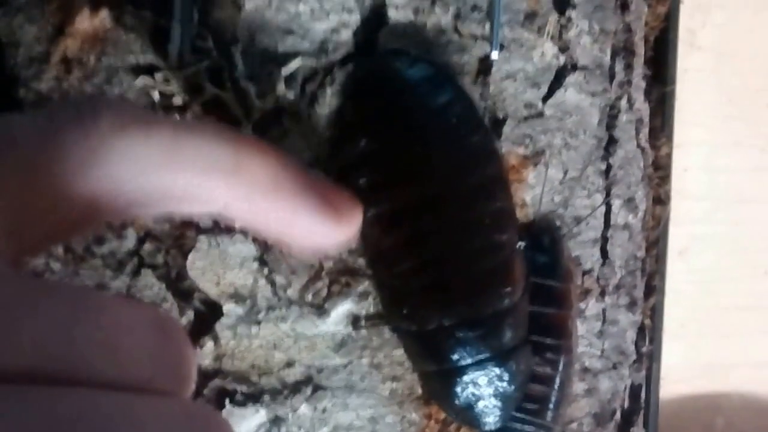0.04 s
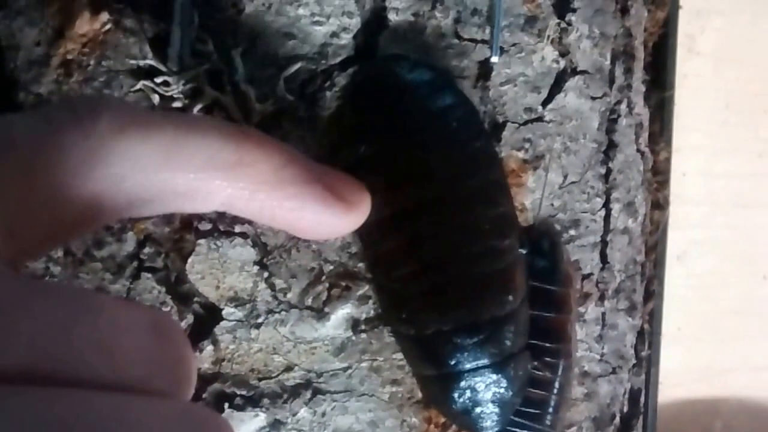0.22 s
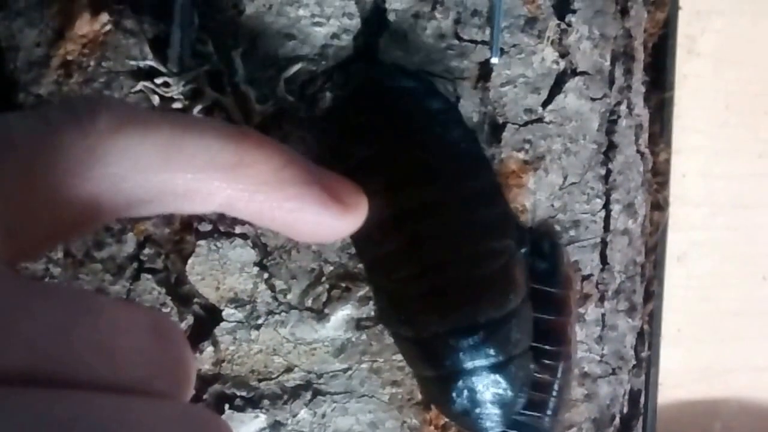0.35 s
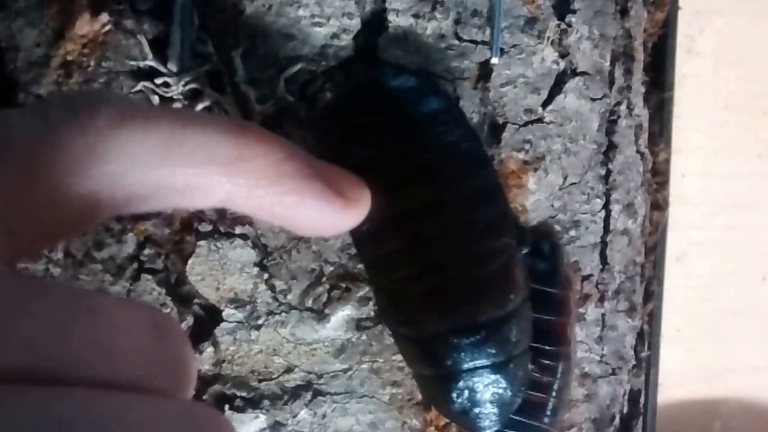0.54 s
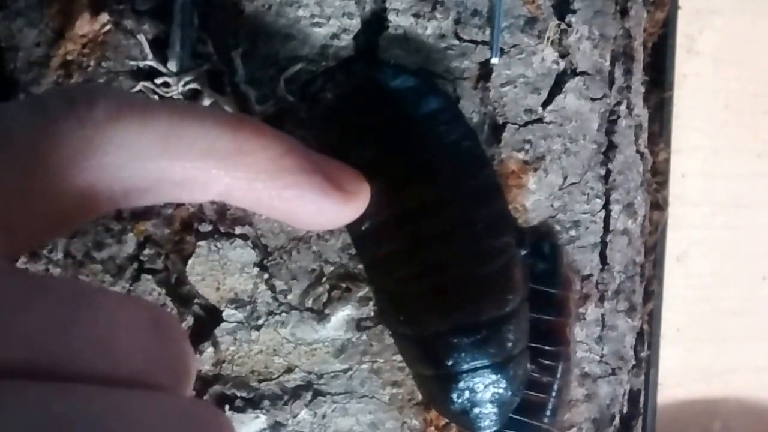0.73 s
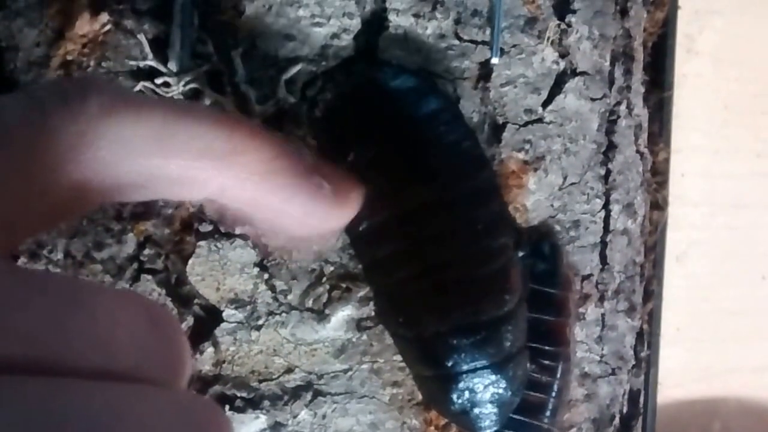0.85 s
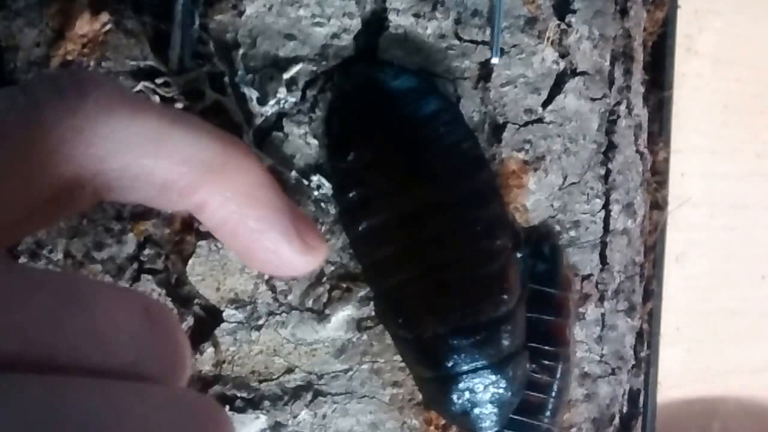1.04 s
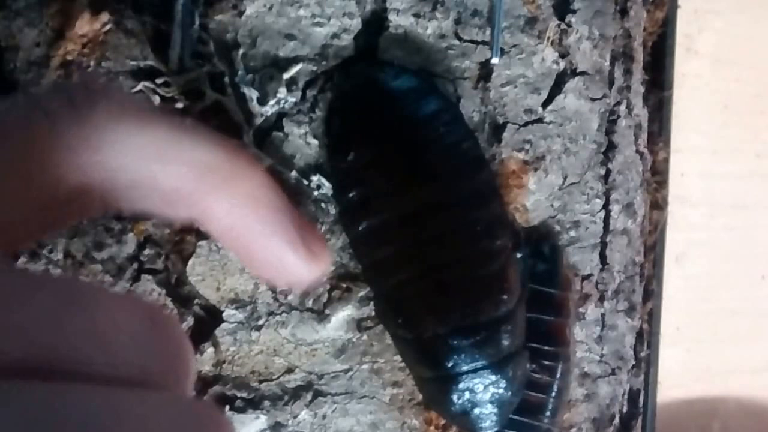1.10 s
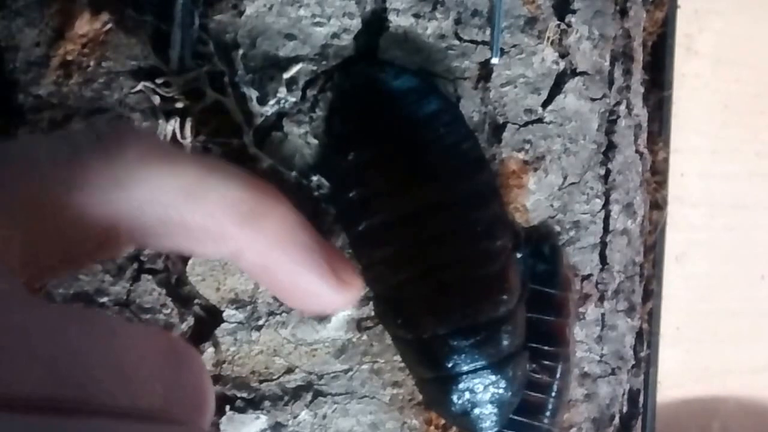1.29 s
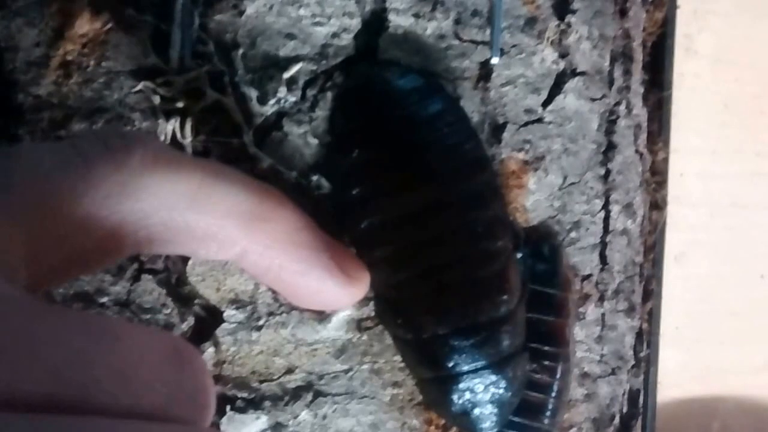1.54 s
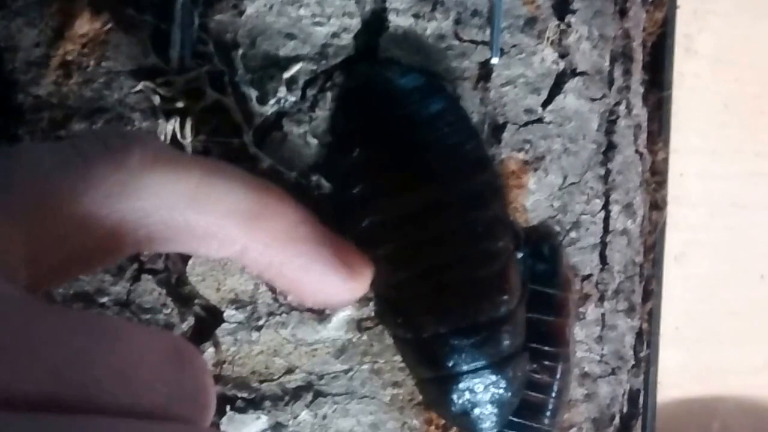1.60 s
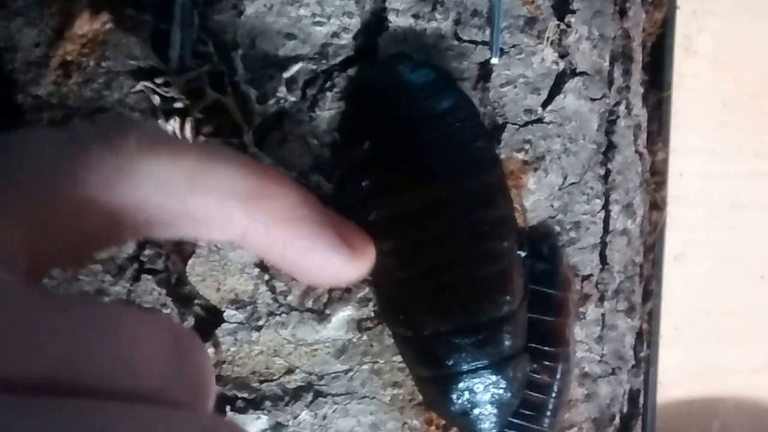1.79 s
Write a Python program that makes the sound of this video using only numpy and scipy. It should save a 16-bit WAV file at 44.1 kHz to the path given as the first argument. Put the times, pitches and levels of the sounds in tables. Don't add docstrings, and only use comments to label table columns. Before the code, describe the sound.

A large cockroach hisses once, loud and close: quiet until 0.19 s, then a sudden bright, rough rush of air, strongest near 0.45 s, weakening after 0.73 s and gone by 0.8 s. Short reflections from the glass tank colour it in wide stereo. Beneath are low motor hum, house rumble and faint noise, with soft low handling bumps near 0.05, 0.55 and 1.05 s; only quiet background follows.

```python
import sys
import numpy as np
from scipy import signal
from scipy.fft import rfft, irfft, next_fast_len
from scipy.io import wavfile
from scipy.ndimage import uniform_filter1d, map_coordinates

SR = 44100
rng = np.random.default_rng(int(sys.argv[2]) if len(sys.argv) > 2 else 0)


def natural_amplitude(level_db):
    exponent = np.asarray(level_db, float) / 20
    return 10 ** exponent


def store_pcm(level_fs):
    pcm = np.round(np.clip(level_fs, -1, 1) * 32767).astype(np.int16)
    wavfile.write(sys.argv[1], SR, np.atleast_2d(pcm).T)


N = 81585
T = np.arange(N) / SR

# time in seconds, level in dB.
EFFORT = [
    (.19, -77),
    (.195, -57),
    (.198, -40.5),
    (0.242, -35),
    (.44, -29.5),
    (.73, -31),
    (0.767, -33.5),
    (0.778, -40.5),
    (0.793, -97),
]
# centre in Hz, width in Hz, level in dB.
LEFT_MODES = [(1280, 73, -20), (2450, 440, -18), (3460, 710, -11.5), (3930, 350, -9), (4960, 590, -13),
              (5624, 450, -5), (6990, 560, -2.5), (7850, 330, 0), (8790, 380, -1), (9550, 340, -3),
              (10200, 580, -7), (10780, 200, -11.5), (11550, 400, -9), (14200, 1700, -17)]
RIGHT_MODES = [(1308, 130, -19), (1842, 157, -11.5), (2410, 470, -18), (4000, 606, -5), (4830, 525, 1),
               (5430, 350, -2.5), (6800, 340, -7.5), (7580, 230, -6), (8480, 370, -7), (8700, 540, -6),
               (9620, 230, -10), (10830, 250, -8), (11550, 370, -13.5), (15000, 580, -21)]
# frequency in Hz, level in dB.
JET_SPECTRUM = [(700, -43), (1100, -18), (2000, 8), (6200, 2), (12600, 11), (13600, 0), (15300, 3),
                (15600, -23)]
# frequency in Hz, lag in cycles.
TRAIL_LOW = [(1450, 0), (1950, .5), (3150, .5), (3650, 1.05), (4900, 1.56), (5500, 2.13), (6100, 2.2),
             (7000, 2.28)]
TRAIL_HIGH = [(8250, 2.62), (8480, 3.1), (9300, 3.15), (9800, 3.5), (10300, 3.5), (11900, 4), (12300, 4),
              (12600, 4.5)]
TRAIL_TOP = [(13500, 4.5), (14450, 5), (14700, 5), (15300, 5.6)]
# low Hz, high Hz, share from 0 to 1.
MIRROR_BANDS = [(990, 1260, .99), (1913, 2522, 1), (2540, 2800, 0.36), (2840, 3050, 0.89),
                (11600, 15000, .6), (12600, 12000, .55), (14480, 14660, .85)]
# delay in ms, level in dB.
WALL_ECHOES = [(1.1, -19.5), (1.7, -20), (2.3, -17.5), (3.4, -17.5), (4.3, -16.5), (5.9, -17.5),
               (8.2, -18.5), (11.5, -20.5)]
# frequency in Hz, rms level in dB, left over right in dB, left lead in rad,
# share of the beat.
MOTOR_ORDERS = [(42.9, -55.5, 3.5, 0.72, 0.1), (128.8, -53.5, 3, 0.83, 0.74),
                (172.3, -66.5, 1.5, 1.15, 0.3), (258.4, -74, 1.5, 2.2, -0.42),
                (320, -75.5, 4.5, 1.8, -0.69), (1233, -73, -2, .05, -0.043)]
# time in seconds, swell in dB.
ROOM_BEAT = [(0, -9.5), (0.091, -2.5), (.3, -8), (.7, -2.5), (1.0, .5), (1.26, 3), (1.44, 2), (1.49, -6.5),
             (1.53, 0), (1.6, -6), (1.66, -2.5), (1.84, -6.5)]
# start in seconds, length in seconds, pitch in Hz, level in dB.
HAND_BUMPS = [
    (0.032, 0.089, 36.2, -43.5),
    (.512, 0.11, 38.2, -39.5),
    (1.027, 0.056, 37.8, -47.5),
]
# frequency in Hz, level in dB.
SKIN_SPECTRUM = [(60, 7), (300, -5), (700, -2.5), (1000, -34)]
# frequency in Hz, density in dB per Hz.
RUMBLE_SPECTRUM = [(15, -7.5), (40, -4), (70, -5), (150, -11.5), (300, -10), (450, -11), (700, -26),
                   (1000, -33)]
# frequency in Hz, density in dB per Hz.
PORT_SPECTRUM = [(120, -23), (321, -0.5), (940, -10.5), (1210, -10.5), (1980, -12), (2600, -12.5),
                 (4500, -14.5), (15500, -20)]
# frequency in Hz, share.
INTO_LEFT = [(300, 0.37), (3000, 0.38), (5000, 0.1), (7500, .4), (10000, 0.34), (15000, .2)]
INTO_RIGHT = [(300, 0.78), (3800, 0.72), (5000, 0.18), (9000, 0.072)]


def hiss():
    seconds, level_db = np.transpose(EFFORT)
    effort_db = np.interp(T, seconds, level_db, -120, -120)
    pair = unit(filtered(jet_at_ports(), tank_paths))
    bright_hz, bright_grows = 7000, 0.6
    low = filtered(pair, lambda hz: 1 / (1 + (hz / bright_hz) ** 8))
    treble = natural_amplitude(bright_grows * (effort_db - level_db.max()))
    flutter_db = 0.36 * (wobble(26.2) + wobble(91.1))
    return natural_amplitude(3.0 + effort_db + flutter_db) * (low + treble * (pair - low))


def jet_at_ports():
    scatter_db, tremble_hz, tremble_s = 2.5, 10.25, 0.255
    phase = 2 * np.pi * tremble_hz * (T - tremble_s) + 0.24 * wobble(8.6)
    shared = filtered(turbulence(), lambda hz: np.sqrt(1 - diffuse_share(hz)))
    separate = np.array([turbulence(), turbulence()])
    scattered = filtered(separate, lambda hz: np.sqrt(diffuse_share(hz)))
    return shared + natural_amplitude(scatter_db * np.cos(phase)) * scattered


def turbulence():
    patchy_db = 0.7
    z = signal.stft(rng.standard_normal(N), nperseg=256)[2]
    field = uniform_filter1d(rng.standard_normal(z.shape), 6, 0)
    field = uniform_filter1d(field, 8, 1)
    return signal.istft(z * natural_amplitude(patchy_db * unit(field)), nperseg=256)[1][:N]


def mirror(hz):
    total = 0
    for low, high, share in MIRROR_BANDS:
        inside = np.minimum(hz - low, high - hz) / 80 + 1
        total = total + share * np.clip(inside, 0, 1)
    return np.clip(total, 0, 1)


def diffuse_share(hz):
    return 0.18 * (1 - mirror(hz))


def resonances(modes, hz):
    skirt, valley_db, step_down_hz = 3.2, -29, 15330
    peaks = sum(natural_amplitude(2 * db) / (1 + np.abs(2 * (hz - centre) / width) ** skirt)
                for centre, width, db in modes)
    broad = natural_amplitude(2 * (valley_db + along(JET_SPECTRUM, hz)))
    return np.sqrt(peaks + broad) * np.where(hz < step_down_hz, 1, natural_amplitude(-9))


def tank_paths(hz):
    left, right = resonances(LEFT_MODES, hz), resonances(RIGHT_MODES, hz)
    both, alike = np.sqrt(left * right), mirror(hz)
    left = left + alike * (both - left)
    right = right + alike * (both - right)
    trail = np.exp(-2j * np.pi * along(TRAIL_LOW + TRAIL_HIGH + TRAIL_TOP, hz))
    walls = 1 + sum(natural_amplitude(db) * late(hz, ms) for ms, db in WALL_ECHOES)
    return walls * np.array([left, trail * right])


def motor():
    sway_db, jitter_rad = 1.5, 0.79
    beat_db = np.interp(T, *np.transpose(ROOM_BEAT))
    side = np.array([[0.5], [-0.5]])
    hum = 0
    for hz, db, pan_db, lead, share in MOTOR_ORDERS:
        level_db = db + share * beat_db + sway_db * wobble(13.82) + pan_db * side
        jitter = jitter_rad * (wobble(9.02) + side * wobble(6.86))
        hum = hum + np.sqrt(2) * natural_amplitude(level_db) * np.sin(2 * np.pi * hz * T + jitter + lead * side)
    return hum


def bumps():
    noise = rng.standard_normal((2, N))
    skin = natural_amplitude(-18.5) * unit(filtered(noise, lambda hz: natural_amplitude(along(SKIN_SPECTRUM, hz))))
    rock = 0
    for start, length, hz, db in HAND_BUMPS:
        progress = np.clip((T - start) / length, 0, 1)
        swell = np.sin(np.pi * progress ** 0.65) ** 0.8
        rock = rock + natural_amplitude(db) * swell * (np.sin(2 * np.pi * hz * (T - start)) + skin)
    return rock * natural_amplitude([[1.4], [-1.4]])


def house_rumble():
    correlation = 0.18
    a, b = rng.standard_normal((2, N))
    angle = np.arccos(correlation) / 2
    pair = np.cos(angle) * a + np.sin(angle) * b * np.array([[1], [-1]])
    return natural_amplitude(-59.5) * unit(filtered(pair, lambda hz: natural_amplitude(along(RUMBLE_SPECTRUM, hz)) * (hz > 12)))


def port_noise():
    steer_ms = 0.39
    ports = rng.standard_normal((2, N))
    cross = filtered(ports[::-1], lambda hz: late(hz, steer_ms) * [along(INTO_LEFT, hz), along(INTO_RIGHT, hz)])
    air = unit(filtered(ports - cross, lambda hz: natural_amplitude(along(PORT_SPECTRUM, hz)) * (hz > 180)))
    return natural_amplitude(-57.5 + 0.17 * wobble(3.9)) * air


def unit(x):
    return x / np.sqrt(np.mean(x ** 2) + 1e-20)


def along(points, hz):
    f, v = np.transpose(points)
    return np.interp(np.log(hz + 1), np.log(f + 1), v)


def wobble(rate):
    return map_coordinates(rng.standard_normal(int(N * rate / SR) + 4), [T * rate])


def filtered(x, response):
    m = next_fast_len(N + 8192)
    return irfft(rfft(x, m) * response(np.fft.rfftfreq(m, 1 / SR)), m)[..., :N]


def late(hz, ms):
    return np.exp(-2j * np.pi * hz * ms / 1000)


def scene():
    return hiss() + motor() + bumps() + house_rumble() + port_noise()


def band_limit(x):
    return signal.sosfilt(signal.butter(12, 16060, fs=SR, output="sos"), x)


def record(dry):
    fade_in_s, top_hz = 0.071, 15480
    fade = np.clip(0.73 + T / fade_in_s, 0, 1)
    mix = filtered(dry * fade, lambda hz: hz < top_hz)
    return band_limit(mix)


dry = scene()
out = record(dry)
store_pcm(out)
```